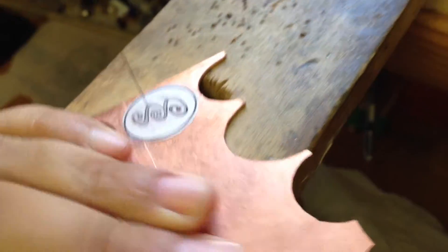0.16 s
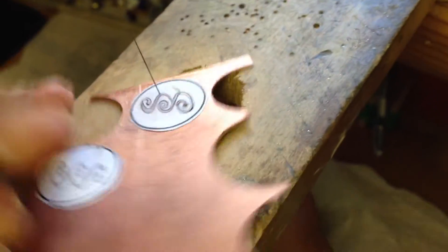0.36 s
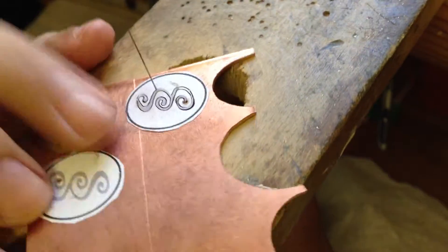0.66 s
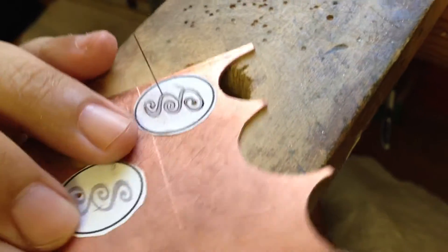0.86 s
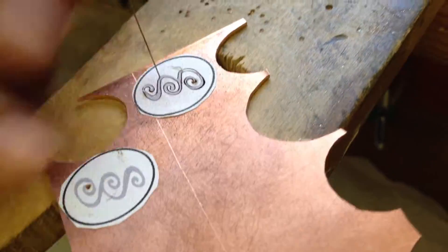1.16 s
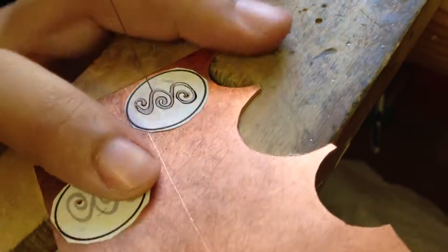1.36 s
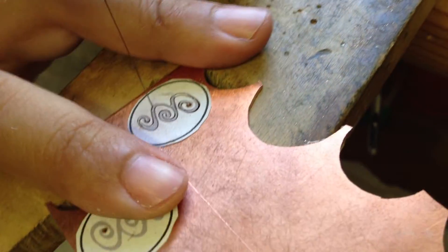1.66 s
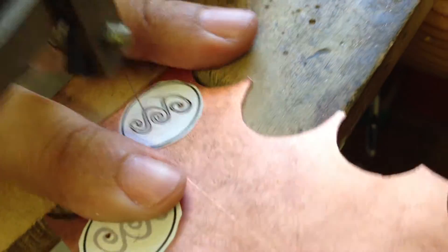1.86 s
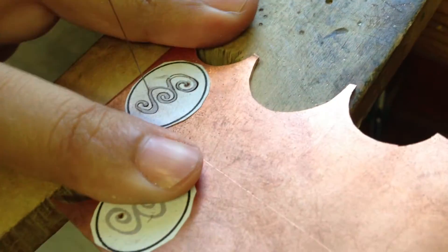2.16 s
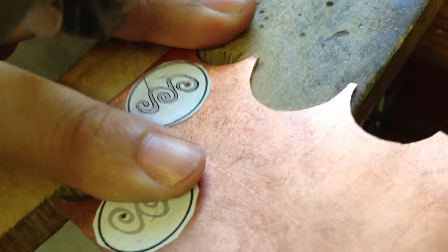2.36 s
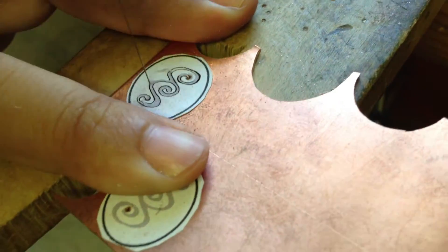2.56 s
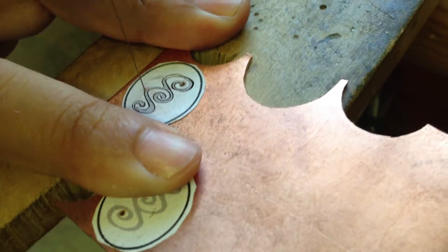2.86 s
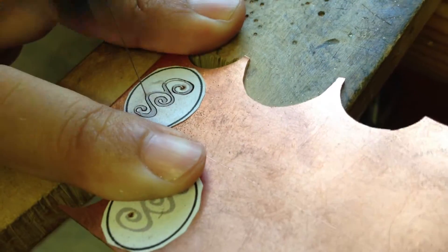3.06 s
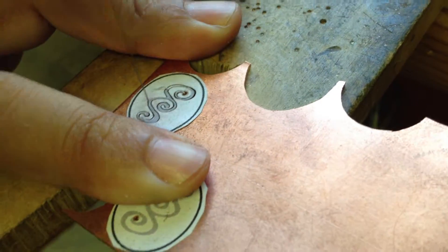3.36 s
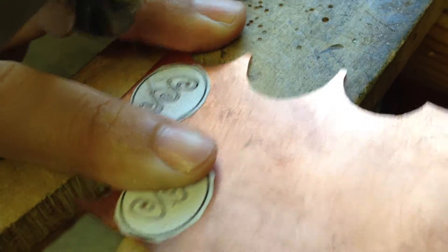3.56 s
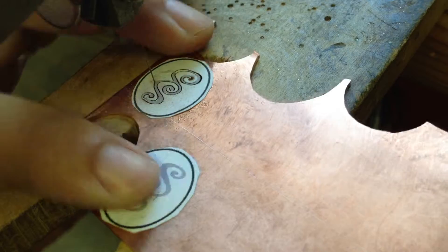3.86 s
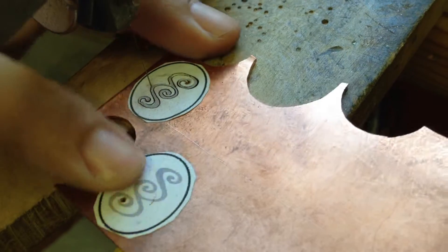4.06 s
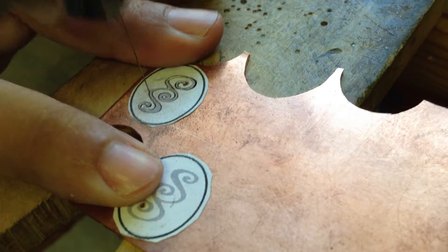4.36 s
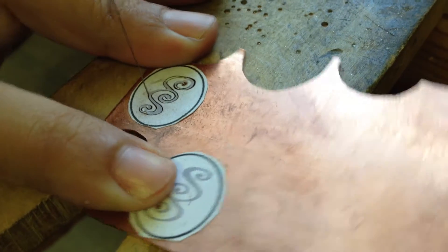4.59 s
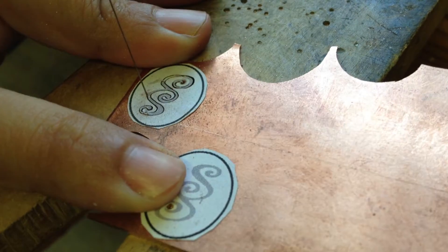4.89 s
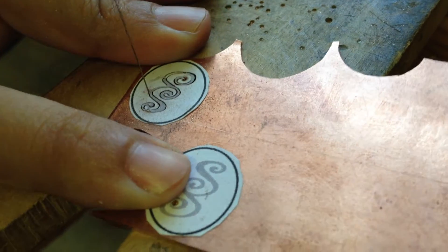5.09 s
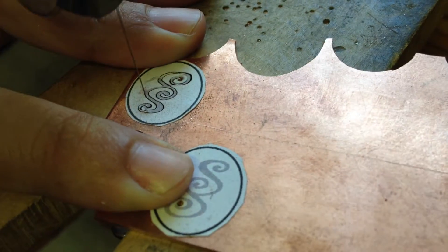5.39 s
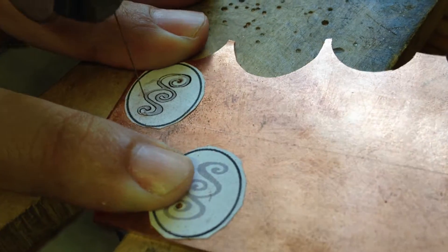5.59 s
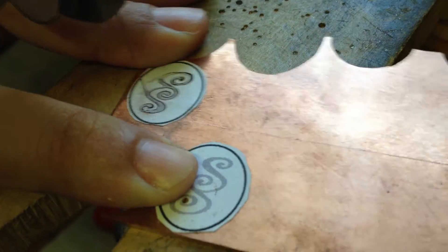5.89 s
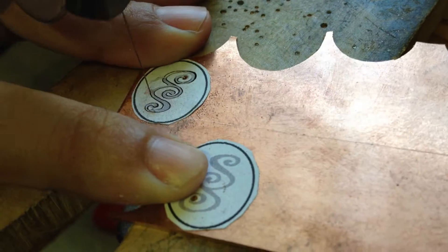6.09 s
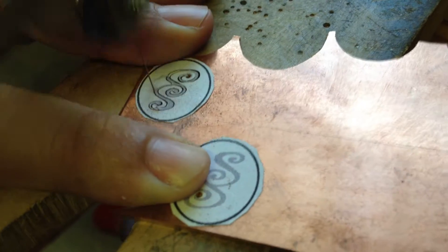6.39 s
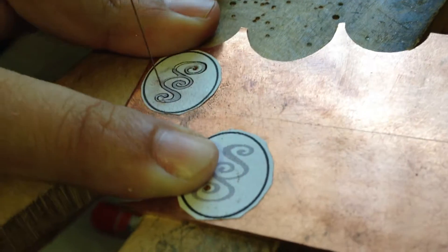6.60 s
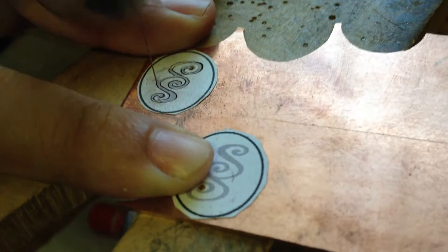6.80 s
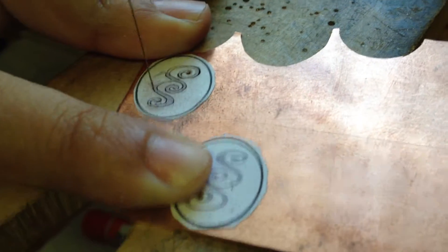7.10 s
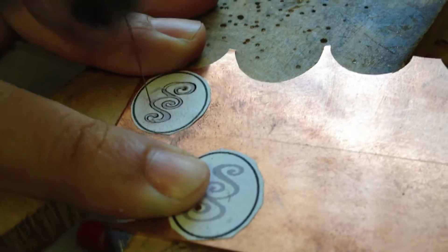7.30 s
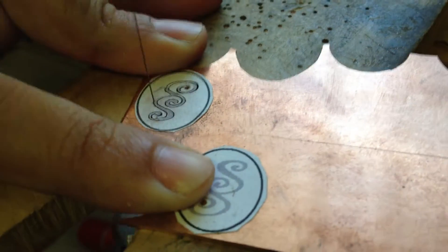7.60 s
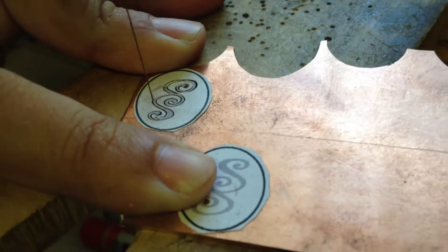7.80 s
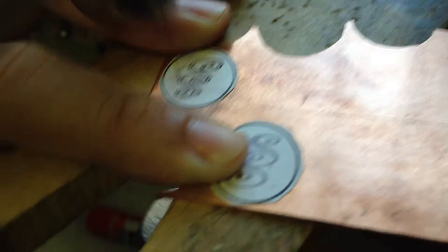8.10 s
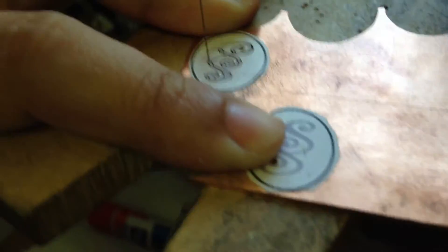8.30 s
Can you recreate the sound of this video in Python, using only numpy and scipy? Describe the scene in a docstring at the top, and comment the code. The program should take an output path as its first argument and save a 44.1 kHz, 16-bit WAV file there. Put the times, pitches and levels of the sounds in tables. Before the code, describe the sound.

Heard very close in a quiet, faintly humming room, a saw stroke on copper sheet dies away, then the sheet is shifted with light scrapes, snags and rattles on a wooden bench pin. Short raspy strokes follow, metallic and chattering with dull wooden thuds. A mostly quiet stretch of faint slides and taps leads to quick, regular back-and-forth sawing.

```python
"""A fine saw blade cuts copper sheet on a wooden bench pin, heard from close by in a quiet, humming room.
First a stroke dies away; the sheet is turned, slides, snags and rattles on the pin. From 1.7 s short strokes
make the teeth chatter into the ringing sheet while the pin thuds below. From 3.6 s there are mostly faint slides
and taps, a few strokes and, at 5.6 s, one metal tink; from 6.2 s strokes follow closely until a last slide.
Random bites drive the resonances of sheet and pin; the tink is three fading sines."""
import sys
import numpy as np
from scipy import signal
from scipy.fft import rfft, irfft, next_fast_len
from scipy.io import wavfile
from scipy.ndimage import uniform_filter1d, map_coordinates

SR = 44100
rng = np.random.default_rng(int(sys.argv[2]) if len(sys.argv) > 2 else 0)


def file_out(sig):
    """Save sig as 16-bit WAV at sys.argv[1]."""
    # one column per channel
    cols = np.atleast_2d(sig).T
    # limit, then scale
    lim = np.clip(cols, -1, 1)
    pcm = np.round(lim * 32767).astype(np.int16)
    wavfile.write(sys.argv[1], SR, pcm)


N = 372644

# In all tables t60 is the time in which a sound falls by 60 dB.
# strokes of the blade: start t/s, rise/s, length/s, level after the rise/dB, drift along the stroke/dB,
# treble against body/dB, pin against body/dB
STROKES = [(-.008, 0.0078, 0.046, -24, -12.5, -7.5, -15), (0.191, 0.019, 0.097, -41.5, -10, -6, -4.5),
           (1.671, 0.11, 0.18, -34, -11.5, -2.5, -5), (1.898, 0.064, 0.19, -43, 6.5, -0.5, -10.5),
           (2.241, 0.052, 0.14, -32, -5, -2.5, -6.5), (2.452, .04, 0.039, -44, 5, -4.5, 0),
           (2.565, 0.064, .18, -31.5, -19.5, -7, -8.5), (2.84, 0.039, 0.13, -33.5, 5.5, -2.5, -11),
           (3.021, 0.088, 0.17, -28.5, -4.5, -6, -12), (3.362, 0.011, 0.11, -30.5, -4, -3, -8),
           (4.33, 0.12, 0.24, -49.5, 9.5, -1, -3.5), (5.091, 0.018, 0.095, -42, -19.5, 3.5, 6),
           (5.166, 0.065, 0.13, -44, -5, 6.5, -2.5), (6.19, 0.015, .11, -45.5, 4, 2.5, 0),
           (6.385, 0.064, 0.17, -37, -7.5, -1, 3), (6.731, 0.025, 0.12, -28, -11, 2, -5),
           (6.892, 0.029, 0.12, -43.5, 7, 2, 2), (7.154, 0.012, 0.13, -29.5, -11.5, 1, -2.5),
           (7.32, 0.021, 0.11, -43, 14, 0.5, -7), (7.577, 0.013, 0.14, -31, -9, 2, -2),
           (7.769, 0.048, 0.17, -36.5, -8.5, -4.5, -1.5), (7.98, 0.069, .19, -37, -1, 3.5, 0),
           (8.208, 0.078, 0.14, -37, 2, -1, -8.5)]
# snags of the blade and taps of the sheet: t/s, relative level/dB, treble against body/dB,
# relative pin level against body/dB, t60/s
SNAGS = [(0.197, -39, -21, -29, 0.01), (0.292, -28.5, -7, -31, 0.034), (0.462, -29, -14, -6, 0.038),
         (0.505, -26, -6, -23, 0.056), (2.078, -16, -11, -4.5, 0.087), (2.465, -33, -13, -6, 0.027),
         (2.498, -21.5, -7, -8, 0.01), (2.567, -22.5, -14, -4.5, 0.022), (2.589, -19.5, -7, -26, 0.024),
         (3.185, -17.5, -2.5, -32, 0.038), (3.371, -23, -17, -24, 0.02), (3.385, -19, -28, -34, 0.054),
         (3.561, -65, 20, -2, 0.042), (4.472, -31.5, 1.5, -2, 0.026), (4.779, -44, -20, -1, 0.0085),
         (5.096, -34, -10, 12.5, 0.018), (5.622, -59, 5, 19, 0.008), (5.841, -43, -25, 3, 0.0083),
         (6.201, -34, -17, -5, 0.0072), (6.283, -30, 7.5, 4, 0.028), (6.601, -26, -20, 9.5, 0.029),
         (6.739, -29.5, 10, -18, 0.013), (7.162, -21.5, -2, 3, 0.0079), (7.224, -22, 8.5, -15, 0.018),
         (7.586, -17, 8, -0.5, 0.013), (7.645, -23.5, 10, 0, 0.013), (8.006, -45, -4, -8, 0.013)]
# high modes (ways of ringing) shared by all grips, which change only their level:
# f/Hz, width/Hz, relative level/dB
BLADE = [(10300, 53, 3), (9940, 110, -21), (10410, 350, 5), (13400, 200, 9), (12600, 260, 4),
         (14200, 110, -18), (15000, 100, -20)]
# The next eight tables hold the modes of the sheet that each grip leaves free.
# Widths below 40 Hz are raised to 40 Hz in sheet(), and the levels vary at random.
# sheet being turned: f/Hz, width/Hz, relative level/dB
TURNING = [(524, 32, 5.5), (1195, 240, -1), (1720, 55, 6), (2280, 36, -7), (2630, 65, -33),
           (3320, 540, 7.5), (4140, 170, 1.5), (4490, 140, -1), (5320, 48, -12), (5500, 460, -5),
           (6540, 35, -19), (6490, 73, -2)]
# sheet tilted: f/Hz, width/Hz, relative level/dB
TILTED = [(534, 33, 6), (1200, 74, -4), (3300, 270, 0.5), (4400, 50, -6), (5600, 64, 5), (6000, 57, -18),
          (6630, 34, -25)]
# a cut being started: f/Hz, width/Hz, relative level/dB
STARTING = [(541.3, 28, -1), (853, 13, -0.5), (1046, 36, 9), (1880, 150, -3), (2410, 66, -0.5),
            (2920, 67, 1), (3160, 48, -12), (3450, 540, 1), (3980, 83, 0.5), (4200, 35, 6), (4350, 27, -2),
            (5430, 223, -2.5), (5600, 67, -9)]
# sheet pressed down: f/Hz, width/Hz, relative level/dB
PRESSED = [(1540, 91, 6.5), (1823, 66, 11.5), (2430, 300, 0.5), (2917, 176, 3.5), (3530, 200, 1),
           (3906, 48, 11.5), (4340, 220, 4), (5070, 135, 0), (5500, 200, -10)]
# sheet sliding: f/Hz, width/Hz, relative level/dB
SLIDING = [(1110, 40, -3.5), (1542, 19, -12), (1750, 120, -16.5), (2160, 120, -6), (2500, 110, -3),
           (2940, 190, -0.5), (3560, 49, 5.5), (3685, 81, 6), (4180, 540, 2.5), (5400, 20, -19),
           (5600, 81, -31), (6830, 130, -3)]
# sheet held loosely: f/Hz, width/Hz, relative level/dB
LOOSE = [(512, 18.5, -0.5), (809, 28, 3.5), (960, 110, -3.5), (1353, 67, 8), (1490, 160, 4.5),
         (1713, 143, 5), (1854, 67, -0.5), (2370, 130, -10), (2900, 64, -6), (3203, 93, -3.5),
         (3676, 113, -3), (4265, 150, -32), (4316, 43, -8.5), (5250, 105, -7.5), (5670, 31, -3),
         (7300, 690, -17.5)]
# blade on its cutting stroke: f/Hz, width/Hz, relative level/dB
CUTTING = [(543, 23, -1.5), (930, 43, 3.5), (1127, 22, -1), (1620, 78, 1.5), (1830, 16, 0.5),
           (2463, 160, -4.5), (2970, 115, -7), (3550, 86, -3.5), (3882, 40, -1), (4386, 88, -0.5),
           (5100, 23, -5.5), (5390, 200, -4), (5840, 64, -8.5), (6744, 170, -8.5)]
# blade on its way back: f/Hz, width/Hz, relative level/dB
RETURNING = [(561, 21.6, 9.5), (650, 17, 1.5), (1103, 27, 7.5), (1366, 18, 4.5), (1786, 72, 2),
             (2110, 24, -14), (2360, 61, -10), (3003, 27, -2), (3076, 12, -9.5), (3704, 70, 6),
             (4350, 84, 4.5), (5090, 41.1, 1.5), (5830, 140, -2.5), (6050, 34, -28), (6360, 180, -4)]
# when each grip takes over: t/s, modes, level of the top octave/dB
GRIPS = [(0, TILTED, -1), (.19, TURNING, 4), (1.5, STARTING, 2), (1.895, LOOSE, 2), (2.242, STARTING, 3.5),
         (2.442, LOOSE, -1.5), (3.35, LOOSE, 4), (3.6, SLIDING, -13), (4.3, SLIDING, 11), (5, PRESSED, 0),
         (5.405, SLIDING, 0), (6.18, SLIDING, 3), (6.375, CUTTING, 7.5), (6.7, CUTTING, -3),
         (6.892, RETURNING, 2.5), (7.15, CUTTING, -2.5), (7.322, RETURNING, 6), (7.57, CUTTING, 0),
         (7.762, RETURNING, 8.5), (7.972, CUTTING, 0), (8.202, RETURNING, 5.5)]
# modes of the wooden bench pin: f/Hz, width/Hz, relative level/dB
PIN = [(154, 29.5, 1.5), (257.3, 39, -3.5), (335, 109, -8)]
# modes of the sheet slapping the pin: f/Hz, width/Hz, relative level/dB
SLAP = [(178, 33, 5.5), (260, 10.2, 8), (318.5, 29, 2.5), (500, 29, -3.5)]
# the many weak modes between the strong ones: f/Hz, relative level/dB
WEAK_MODES = [(260, -53), (450, 4), (562, 4), (756, -1), (1580, 6.5), (2260, -4), (4340, 1.5), (8570, -14),
              (15500, -19)]
# colour of the room tone: f/Hz, relative level/dB
AIR = [(15, -78), (25, -26), (86, -27), (107, -14), (144, -9.5), (174, -8), (268, -19.5), (602, -19.5),
       (652, -23), (831, -23.5), (14500, -35), (15700, -37)]
# hum, before it wavers: f/Hz, rms level/dB
HUM = [(118.4, -70.5), (177.6, -76.5)]
# how long the room rings: f/Hz, t60/s
ROOM = [(200, 0.87), (2000, 0.27), (10000, 0.51)]
# the sheet sliding on the pin: start t/s, length/s, level at the middle/dB, treble against body/dB,
# pin against body/dB
SLIDES = [(0.32, 0.21, -68.5, 8, -3), (0.448, 0.12, -55, -20, 10.5), (0.549, .18, -57.5, -3.5, -3.5),
          (0.806, 0.11, -59, -0.5, -5), (0.948, .21, -53, -4, -2.5), (1.148, 0.29, -71, -0.5, 11),
          (1.527, 0.084, -58.5, 4.5, 0), (3.542, .16, -68, 5, 3), (3.76, 0.14, -62.5, 2.5, 1),
          (4.17, 0.13, -64, 4.5, -2), (4.62, .14, -64.5, -3, 7), (4.955, 0.29, -69, -2, -5),
          (5.329, .07, -70, -17, 15.5), (5.66, 0.11, -65, 6.5, 4), (5.89, 0.085, -60.5, -1, 3),
          (6.0, 0.26, -63.5, -8, -4), (8.4, 0.084, -52.5, -3.5, -11)]
# a faint metal tink: f/Hz, level/dB, t60/s
TINK = [(2750, -61, .07), (2450, -66, .09), (6050, -63, .13)]

SPLIT_HZ = 2000  # body below, treble above
TOP_OCTAVE_HZ = 7860  # the top octave's level has half its effect here
BAND_LIMIT_HZ = 15350
RISE_DB, RISE_BEND = 16.5, 1.44  # how far under its level a stroke sets in; fast at first, then easing
TREBLE_FOLLOWS, PIN_FOLLOWS = 0.74, 0.77  # share of the drift that each takes
BODY_FADE_DB_PER_S, TREBLE_FADE_DB_PER_S, PIN_FADE_DB_PER_S = 477, 654, 282  # once the blade slows
TREBLE_EARLY_S = 0.0068  # the treble starts to fade before the rest
TOUCH_S = 0.0053  # the teeth meet the metal over this time
ARCH_DB = 13.5  # a slide starts and ends this far under its middle
TURNED_UNTIL_S, RATTLE_DB = 0.87, 0.5  # while it is being turned the sheet lies loose and rattles
TINK_S = 5.628


def amp(db):
    """Turn decibels into a plain factor."""
    return 10 ** (np.asarray(db) / 20)


def unit(x):
    """Scale to an rms of 1."""
    return x / np.sqrt(np.mean(np.abs(x) ** 2) + 1e-20)


def along(points, hz):
    """Read a curve of (Hz, value) points on a log frequency axis."""
    f, v = np.transpose(points)
    return np.interp(np.log(hz + 1), np.log(f + 1), v)


def wobble(rate):
    """Make a smooth random curve with `rate` knots a second."""
    knots = rng.standard_normal(int(N * rate / SR) + 4)
    return map_coordinates(knots, [np.arange(N) * rate / SR])


def filtered(x, response):
    """Multiply the spectrum of x by a complex response of frequency."""
    m = next_fast_len(N + SR // 2)
    f = np.fft.rfftfreq(m, 1 / SR)
    return irfft(rfft(x, m) * response(f), m)[..., :N]


def resonances(modes, f):
    """Add up damped modes of alternating sign, which ring only after they are struck."""
    total = 0
    for k, (centre, width, db) in enumerate(modes):
        damping = 1j * f * width
        total = total + (-1) ** k * amp(db) * damping / (centre ** 2 - f ** 2 + damping)
    return total


def room_tone():
    """Steady hiss and rumble are shaped noise; the faint hum is a few sines of wavering level and pitch."""
    hiss = unit(filtered(rng.standard_normal(N), lambda f: amp(along(AIR, f))))
    t = np.arange(N) / SR
    hum = np.zeros(N)
    for hz, db in HUM:
        level = np.sqrt(2) * amp(db + 4.2 * wobble(3.3))
        hum += level * np.sin(2 * np.pi * hz * t + 0.32 * wobble(9.5))
    return amp(-62.0 + 0.27 * wobble(2.15)) * hiss + hum


def strokes():
    """Rubbing strength on body, treble and pin: each stroke rises, drifts and fades."""
    follows = np.array([[1], [TREBLE_FOLLOWS], [PIN_FOLLOWS]])
    fades = np.array([[BODY_FADE_DB_PER_S], [TREBLE_FADE_DB_PER_S], [PIN_FADE_DB_PER_S]])
    early = np.array([[0], [TREBLE_EARLY_S], [0]])
    u = np.arange(SR // 2) / SR
    touch = np.clip(u / TOUCH_S, 0, 1)
    out = np.zeros((3, N + 2 * SR))  # a spare second at each end
    for s, rise, length, db, drift_db, treble_db, pin_db in STROKES:
        rising = RISE_DB * np.clip(1 - u / max(rise, .001), 0, 1) ** RISE_BEND
        holding = np.clip((u - rise) / max(length - rise, .001), 0, 1)
        fading = fades * np.clip(u - length + early, 0, 1)
        shape = follows * drift_db * holding - rising - fading
        levels = db + np.array([[0], [treble_db], [pin_db]])
        out[:, SR + round(s * SR):][:, :len(u)] += amp(levels + shape) * touch
    return out[:, SR:SR + N]


def teeth(per_second, spread_db, smooth_db, chatter_db):
    """Teeth bite at random moments and sizes over a smooth scrape; the blade chatters in clumps."""
    happens = rng.random(N) < per_second / SR
    sizes = amp(spread_db * rng.standard_normal(N))
    bites = happens * sizes * rng.choice([-1, 1], N)
    force = unit(bites) + amp(smooth_db) * rng.standard_normal(N)
    return unit(force * amp(chatter_db * wobble(90) + 0.75 * wobble(30)))


def patchy(x, patchy_db):
    """The contact point wanders along the blade, so regions of modes swell and fade on their own."""
    z = signal.stft(x, nperseg=256)[2]
    field = uniform_filter1d(rng.standard_normal(z.shape[1:]), size=3, axis=0)  # across frequency
    field = uniform_filter1d(field, size=9, axis=1)  # over time
    return signal.istft(z * amp(patchy_db * unit(field)), nperseg=256)[1][:, :N]


def sheet(force, weak_db, weak_t60, vary_db):
    """Every movement rings the modes that the grip leaves free, at new strengths."""
    size, step = 2 ** 12, SR // 25
    lead = 2 ** 7  # room for the little that the body/treble split spreads ahead of time
    narrowest_hz = 40  # fingers and wood damp every mode
    f, u = np.fft.rfftfreq(size, 1 / SR), np.arange(size) / SR
    low = 1 / (1 + (f / SPLIT_HZ) ** 16)
    edges = sorted(max(round(row[0] * SR), 0) for row in STROKES + SLIDES + GRIPS) + [N]
    out = np.zeros(N + size)
    for start, end in zip(edges, edges[1:]):
        free, top_db = [(modes, db) for s, modes, db in GRIPS if round(s * SR) <= start][-1]
        top = amp(top_db / (1 + (TOP_OCTAVE_HZ / (f + 1)) ** 4))
        varied = [(hz, max(width, narrowest_hz), db + vary_db * rng.standard_normal())
                  for hz, width, db in free]
        strong = resonances(varied, f) + amp(-29.5) * resonances(BLADE, f)
        for a in range(start, end, step):
            b = min(a + step, end)
            # countless weak modes blur into a short ringing noise that changes as the blade travels
            weak = unit(rfft(amp(-60 * u / weak_t60) * rng.standard_normal(size)))
            whole = strong + amp(weak_db + along(WEAK_MODES, f)) * weak
            body = unit(whole * np.sqrt(low))
            treble = top * unit(whole * np.sqrt(1 - low))
            answers = np.roll(irfft([body, treble], size), lead, axis=1)
            out[a:b + size - 1] += signal.fftconvolve(force[:, a:b], answers, axes=1).sum(axis=0)
    return out[lead:lead + N]


def pin(rubbing, slaps):
    """The wooden pin answers with a few low modes; below them it radiates little."""
    loose = np.arange(N) < TURNED_UNTIL_S * SR

    def radiated(f, modes):
        """Modes with the deep bass thinned out."""
        return unit(resonances(modes, f) * (1j * f / (80 + 1j * f)) ** 2)

    forces = np.array([rubbing * ~loose, slaps + amp(RATTLE_DB) * rubbing * loose])
    return filtered(forces, lambda f: np.array([radiated(f, PIN), radiated(f, SLAP)])).sum(axis=0)


def room(x):
    """The room's answer is noise in which each frequency dies at its own speed."""
    hz, t, z = signal.stft(rng.standard_normal(SR // 2), SR, nperseg=256)
    decay = amp(-60 * t / along(ROOM, hz)[:, None])
    tail = signal.istft(z * decay, SR, nperseg=256)[1]
    delayed = np.pad(x, (400, 0))  # 9 ms
    return signal.fftconvolve(delayed, tail / np.linalg.norm(tail))[:N]


def snags():
    """Each snag or tap is a sharp tick with a short fading noise, and slaps the pin once."""
    bursts, slaps = np.zeros((2, N)), np.zeros(N)
    u = np.arange(SR // 10) / SR
    for s, db, treble_db, pin_db, t60 in SNAGS:
        burst = amp(-60 * u / t60) * rng.standard_normal(len(u))
        burst[0] = 4  # the first contact is a sharp tick
        at = bursts[:, round(s * SR):][:, :len(u)]
        at += amp(db - 4.5 + np.array([[0], [treble_db]])) * burst[:at.shape[1]]
        slaps[round(s * SR)] = amp(db + pin_db + 13.0)
    return bursts, slaps


def slides():
    """Rubbing strength on body, treble and pin: each slide swells and sinks in one arch."""
    out, t = np.zeros((3, N)), np.arange(N) / SR
    for s, length, db, treble_db, pin_db in SLIDES:
        near = slice(max(round((s - length) * SR), 0), round((s + 2 * length) * SR))
        arch = ARCH_DB * (2 * (t[near] - s) / length - 1) ** 2
        out[:, near] += amp(db + np.array([[0], [treble_db], [pin_db]]) - arch)
    return out


def drive():
    """Force on body, treble and pin: strokes and slides scale one rough rubbing noise, snags add bursts."""
    rubbing = teeth(per_second=3500, spread_db=3, smooth_db=1.5, chatter_db=1.97)
    force = (strokes() + slides()) * rubbing
    bursts, slaps = snags()
    force[:2] += bursts
    return force, slaps


def tink():
    """One small metal contact nearby rings for a moment as a few fading sines."""
    out, u = np.zeros(N), np.arange(SR // 5) / SR
    ring = sum(amp(db - 60 * u / t60) * np.sin(2 * np.pi * hz * u) for hz, db, t60 in TINK)
    out[round(TINK_S * SR):][:len(u)] = ring
    return out


def scene():
    """Sheet, pin and tink sound close by; the room answers them faintly over its own tone."""
    force, slaps = drive()
    metal = sheet(patchy(force[:2], patchy_db=1.0), weak_db=-10.0, weak_t60=0.031, vary_db=3.27)
    near = metal + pin(force[2], slaps) + tink()
    return (near + amp(-22.5) * room(near) + room_tone())[None]


def record(dry):
    """Nothing is kept above the band limit."""
    return filtered(dry, lambda hz: hz < BAND_LIMIT_HZ)


dry = scene()
out = record(dry)
file_out(out)
```